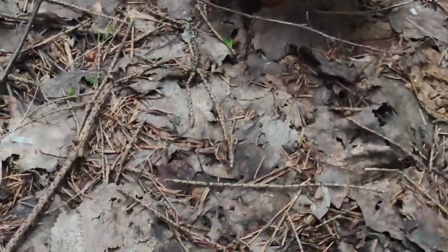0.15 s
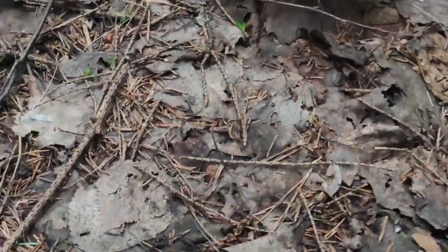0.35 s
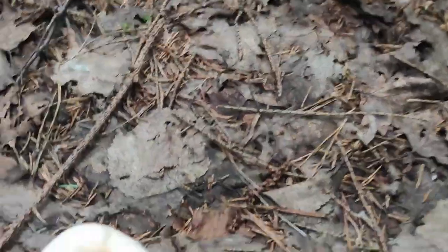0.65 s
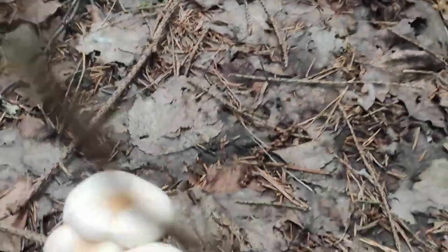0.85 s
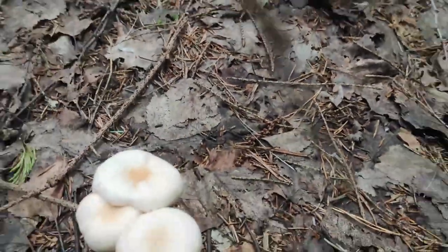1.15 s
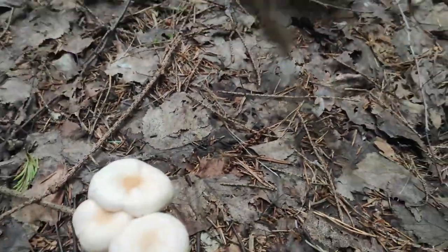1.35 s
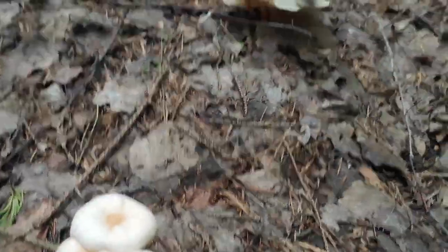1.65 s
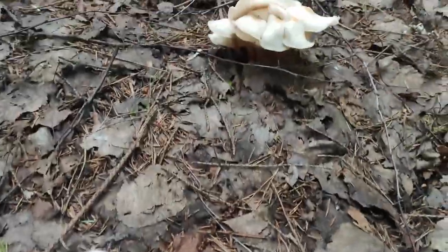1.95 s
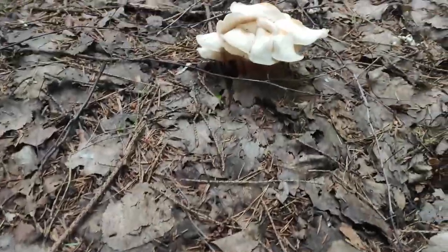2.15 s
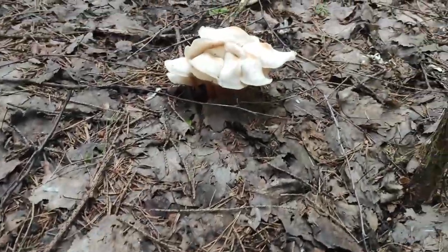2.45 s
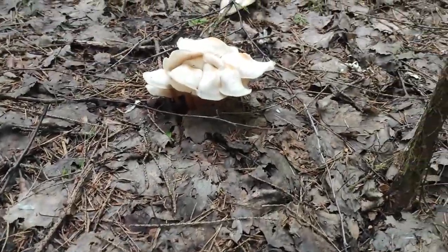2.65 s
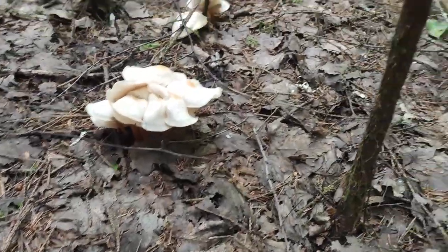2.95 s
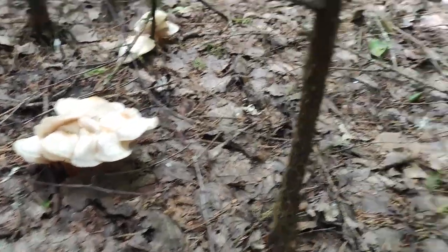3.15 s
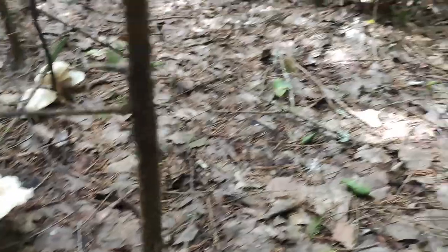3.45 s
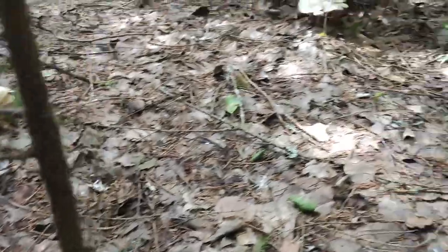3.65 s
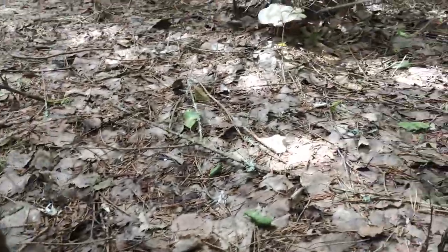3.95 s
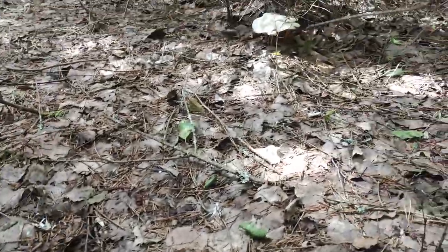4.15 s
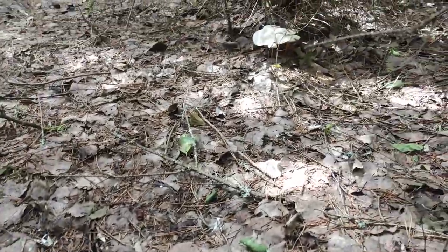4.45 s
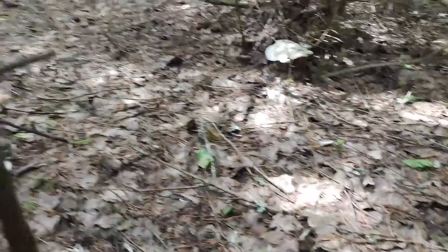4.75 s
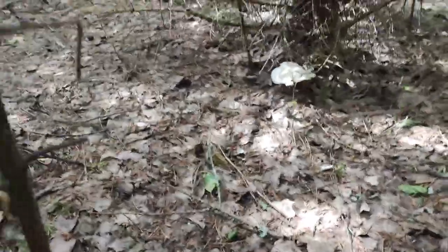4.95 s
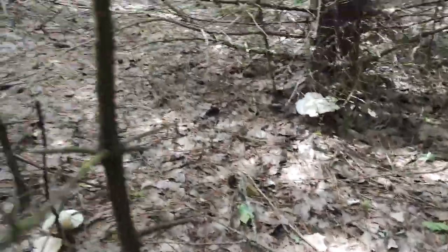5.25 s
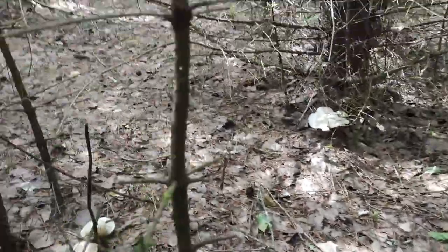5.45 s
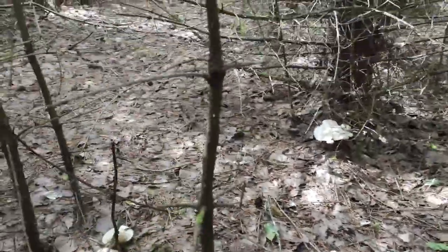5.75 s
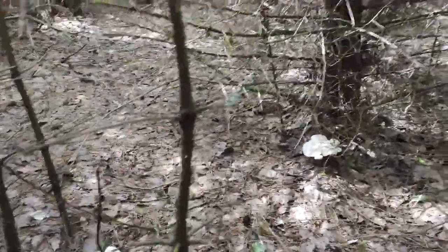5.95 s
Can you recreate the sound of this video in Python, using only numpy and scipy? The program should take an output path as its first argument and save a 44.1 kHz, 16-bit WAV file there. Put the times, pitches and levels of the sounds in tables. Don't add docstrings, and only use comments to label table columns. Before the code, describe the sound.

Close, slow steps on dry leaves and needles: fine crackling throughout, whole leaves crunching, twigs snapping sharply. A very loud snap comes around two and a half seconds, and the densest crunching near five. Far birds chirp quickly at first, then give thin high whistles and three longer calls, softened by echoes from trunks. Low forest hum and gentle treetop hiss, in stereo at chest height.

```python
import sys
import numpy as np
from scipy import signal
from scipy.fft import rfft, irfft, next_fast_len
from scipy.io import wavfile
from scipy.ndimage import uniform_filter1d, map_coordinates

SR = 44100
rng = np.random.default_rng(int(sys.argv[2]) if len(sys.argv) > 2 else 0)


def to_wav(s):
    ch = np.atleast_2d(s).T
    pcm = np.round(np.clip(ch, -1, 1) * 32767)
    wavfile.write(sys.argv[1], SR, pcm.astype(np.int16))


def level_to_linear(level):
    exponent = np.asarray(level, float) / 20
    return 10 ** exponent


N = 269270


def unit(x):
    return x / np.sqrt(np.mean(x ** 2) + 1e-20)


def along(points, hz):
    point_hz, value = np.transpose(points)
    return np.interp(np.log(hz + 1), np.log(point_hz + 1), value)


def curves(rows):
    s, *cols = np.transpose(rows)
    return [np.interp(np.arange(N) / SR, s, c) for c in cols]


def sides(pan_db):
    return np.array([level_to_linear(pan_db / 2), level_to_linear(-pan_db / 2)])


def filtered(x, response):
    m = next_fast_len(N + 8192)
    return irfft(rfft(x, m) * response(np.fft.rfftfreq(m, 1 / SR)), m)[..., :N]


def add(track, s, sound):
    i = max(round(s * SR), 0)
    track[:, i:i + sound.shape[1]] += sound[:, :N - i]


def slow_noise(rate_hz):
    return map_coordinates(rng.standard_normal(int(N * rate_hz / SR) + 4), [np.arange(N) * rate_hz / SR])


def grains(count, span, hz, spread, cycles, scatter_db, lag):
    even, normal = rng.random((count, 3)), rng.standard_normal((count, 3))
    pitch_hz = np.clip(hz * np.exp(spread * normal[:, :1]), 300, SR / 2.5)
    k = np.arange(128)
    turns = pitch_hz * k / SR
    strength = level_to_linear(-scatter_db * np.log(even[:, 1:2] + 0.012)) * np.sqrt(pitch_hz / hz)
    fade = np.exp(-turns / cycles) * np.minimum(2 * turns + 0.32, 1) * (1 - k / len(k))
    wave = strength * np.sin(2 * np.pi * (turns + even[:, 2:])) * fade
    out = []
    for ear in (1, -1):
        start = (even[:, :1] * span + 40 + ear * lag * normal[:, 1:2]).clip(0).astype(int)
        heard = wave * level_to_linear(ear * 2.5 * normal[:, 2:])
        out.append(np.bincount((start + k).ravel(), heard.ravel(), span + 400)[40:span + 40])
    return unit(np.array(out))


def litter():
    # time_s, weight_db, dryness_db
    tread = [(0.0, -61.5, 4), (0.18, -63, 0.5), (0.36, -61, 6), (0.51, -60, 2.5), (1.24, -67, 1.5),
             (1.7, -65, 7.5), (1.93, -67, -1.5), (2.79, -68, 2.5), (3.35, -60, -8), (3.84, -63.5, -3.5),
             (4.08, -68, -1.5), (4.54, -67, -1), (4.74, -61.5, 6.5), (4.91, -55, -12.5), (4.99, -50.5, 4.5),
             (5.16, -54, -7), (5.32, -61.5, 11.5), (5.47, -60, 2.5), (6.1, -63.5, -1.5)]
    weight_db, dry_db = curves(tread)
    press_db = weight_db + 68
    coarse_db = -64.5 + 1.42 * press_db
    crisp_db = -61 + 0.86 * press_db + dry_db
    fine_db = -82 + 1.26 * press_db + 0.64 * dry_db
    shared_db = 1.3 * slow_noise(60)
    coarse_gain = level_to_linear(coarse_db + 0.5 + shared_db + 2.0 * slow_noise(25))
    crisp_gain = level_to_linear(crisp_db + 0.5 + shared_db + slow_noise(30))
    fine_gain = level_to_linear(fine_db + 26.0 + shared_db)
    coarse = grains(count=9000, span=N, hz=1534, spread=0.44, cycles=2.4, scatter_db=2.3, lag=7.95)
    crisp = grains(count=15000, span=N, hz=4300, spread=0.59, cycles=0.4, scatter_db=1.0, lag=8)
    fine = grains(count=13000, span=N, hz=13040, spread=0.3, cycles=2.2, scatter_db=-3.0, lag=8.8)
    return coarse_gain * coarse + crisp_gain * crisp + fine_gain * fine


def crush(db, hz, fizz_db, pan_db, length_s, swell):
    n = round(max(length_s, .008) * SR)
    u = np.linspace(0, 1, n)
    body_hz = hz ** .7 * 3000 ** .3
    body = grains(count=n // 5, span=n, hz=body_hz, spread=0.52, cycles=1.8, scatter_db=3.3, lag=4.5)
    blade = grains(count=n // 40, span=n, hz=hz, spread=0.083, cycles=11.0, scatter_db=4.5, lag=5.4)
    fizz = grains(count=n // 4, span=n, hz=12000, spread=0.31, cycles=0.99, scatter_db=4.5, lag=5)
    jerks = level_to_linear(2 * np.interp(u * length_s / .007, np.arange(40), rng.standard_normal(40)))
    build = .3 + .7 * np.clip(u / swell, 0, 1)
    ends = np.clip(np.minimum(u / .12, (1 - u) / .12), 0, 1)
    mix = body + 0.76 * blade + level_to_linear(fizz_db + 28.5) * fizz
    return level_to_linear(db - 15.5) * jerks * build * ends * mix * sides(pan_db)[:, None]


def crushes():
    # start_s, peak_db, pitch_hz, fizz_db, left_right_db
    small_leaves = [(0.0, -32.5, 1990, -47, 16), (0.554, -28, 5200, -41, 4), (0.829, -32.5, 830, -23, 3),
                    (3.491, -27, 870, -24, 3), (4.748, -34.5, 6400, -21, 29.5),
                    (4.889, -27.5, 3070, -18.5, 0.5), (4.89, -32, 7100, -22, 3), (0.292, -29, 1570, -38, 3),
                    (5.262, -34, 2300, -15, 9), (5.32, -27.5, 3140, -17.5, 0.5),
                    (5.577, -33, 2300, -37, -4), (5.739, -35, 990, -14, -0.5)]
    middle_leaves = [
        (0.69, -30, 1410, -38, 8.5),
        (0.988, -26, 2390, -13, -6),
        (1.689, -35.5, 4200, -29, -3),
        (2.526, -20.5, 2000, -19, -13.5),
        (3.512, -36, 6150, -21, 7),
        (4.69, -30, 2900, -31, 24),
    ]
    large_leaves = [(0.318, -25.5, 1860, -29.5, 1), (0.399, -28, 4830, -31, 1),
                    (1.619, -36, 2180, -16, 0.5), (1.8, -35.5, 5200, -37, 0), (2.17, -39.5, 5230, -39, -4),
                    (2.809, -44, 5470, -38, -14), (4.819, -29.5, 1310, -26, 0.5),
                    (4.95, -25, 3300, -21.5, 4), (4.95, -29.5, 6950, -20, 0), (5.305, -36, 6000, -12, 0),
                    (5.094, -31, 950, -20, 2), (5.159, -51, 880, -12, 7), (5.389, -49.5, 5460, -6, -4)]
    out = np.zeros((2, N))
    # length_s, swell (share of the length over which the crush builds)
    sizes = ((small_leaves, .024, .08), (middle_leaves, .037, .6), (large_leaves, .076, .15))
    for rows, length_s, swell in sizes:
        for s, db, hz, fizz_db, pan_db in rows:
            add(out, s, crush(db, hz, fizz_db, pan_db, length_s, swell))
    return out


def snap(db, hz, fizz_db, pan_db, t60_s):
    t = np.arange(900) / SR
    fade = level_to_linear(-60 * t / max(t60_s * (2500 / hz) ** .5, .002)) * (1 - np.exp(-t * hz / .55))
    modes = ((0.99, 1), (0.856, 0.29), (1.24, 0.53), (1.72, 0.38), (2.24, 0.55))
    ring = fade * sum(g * np.sin(2 * np.pi * hz * r * t) for r, g in modes if hz * r < 8500)
    crack = 0.25 * rng.standard_normal((2, len(t))) * level_to_linear(-60 * t / 0.00033)
    fizz = level_to_linear(fizz_db + 28.0) * np.diff(rng.standard_normal((2, len(t) + 2)), 2) * fade
    pair = np.array([ring, np.roll(ring, 3)]) + crack + fizz
    pair = np.pad(pair, ((0, 0), (62, 62)))
    f = np.fft.rfftfreq(1024, 1 / SR)
    pair = irfft(rfft(pair) / (1 + (.62 * hz / (f + 1)) ** 6), 1024)
    return level_to_linear(db - 2.5) * pair * sides(pan_db)[:, None]


def snaps():
    # start_s, peak_db, pitch_hz, fizz_db, left_right_db
    near_twigs = [
        (.0503, -6, 3000, -38, -19),
        (2.5495, -1, 5700, -29, -8),
        (4.7582, -9, 6300, -30, 19),
        (5.2965, -17, 3000, -26, 4),
    ]
    dead_twigs = [(0.237, -24.5, 1900, -47, 1), (0.305, -18, 940, -34, -1), (0.336, -18, 2080, -35, 0),
                  (0.348, -16, 2360, -34, 7), (0.565, -30, 4000, -17, -20.5), (0.989, -19, 2200, -29, 0),
                  (1.32, -19, 6100, -50, 7), (1.505, -27.5, 1110, -38, -3), (2.535, -18, 2150, -24, 0),
                  (2.5535, -7, 5960, -21, -11), (3.127, -30.5, 915, -32, -1), (3.494, -24, 910, -43, -2),
                  (3.904, -31, 2400, -47, 7), (4.609, -32, 3140, -37, 21), (5.0122, -12, 5250, -22, 4),
                  (5.103, -26, 1030, -27, 0), (5.298, -13.5, 1700, -33, 3), (5.2988, -10, 4300, -20.5, 8),
                  (5.841, -46, 934, -4, -9)]
    stiff_twigs = [
        (0.741, -23, 7140, -13, 0),
        (1.283, -32, 1210, -36, 1),
        (2.457, -33, 7400, -18, 4),
        (4.98, -50, 1320, -22, 4),
        (0.707, -32, 2900, -48, 12),
        (5.557, -31, 630, -31, -2),
        (5.575, -30, 2220, -38, -3),
        (5.739, -31, 1030, -18, 4),
        (5.953, -28.5, 1110, -26.5, -3),
        (6.073, -36, 6000, -14.5, 0),
    ]
    fibre_run = [
        (.9952, -30, 6000, -34, -8),
        (.9996, -26, 6800, -34, -10),
        (1.0036, -26, 6500, -30, -8),
        (1.0083, -25, 5800, -32, -10),
        (1.0103, -22, 5500, -32, -12),
        (1.0142, -24, 7200, -34, -8),
        (1.0217, -30, 6000, -36, 0),
        (1.0254, -25, 6400, -32, 8),
    ]
    scattered_fibres = [(0.354, -32, 1600, -35, 2.5), (2.528, -24, 2180, -32, -8), (2.541, -17, 2130, -36, -11),
                        (3.506, -27, 5860, -32, 3.0), (4.676, -38, 3120, -32, 13), (4.714, -37, 3150, -32, 13.5),
                        (4.763, -27, 5570, -29, 11.5), (4.891, -32, 3020, -32, 1.0), (4.98, -33, 1290, -32, -1),
                        (5.012, -22, 3060, -27, 2.5), (5.021, -37, 1020, -32, 2.0),
                        (5.152, -33, 1570, -35, -1.5), (5.264, -33, 3640, -32, 1.0), (5.282, -19, 4400, -24, 8),
                        (5.654, -40, 2070, -30, -1), (5.697, -32, 2760, -28, -1.0)]
    out = np.zeros((2, N))
    # t60_s, kind_db
    kinds = ((near_twigs, .0042, 0), (dead_twigs, .0072, -3), (stiff_twigs, .013, 0),
             (fibre_run, .004, 3), (scattered_fibres, .004, 3))
    for rows, t60_s, kind_db in kinds:
        for s, db, hz, fizz_db, pan_db in rows:
            add(out, s - 0.001, snap(db + kind_db, hz, fizz_db, pan_db, t60_s))
    return out


def scrapes():
    # start_s, length_s, first_hz, last_hz, level_db
    drags = [
        (4.82, .055, 1050, 1300, -41),
        (3.496, .016, 480, 650, -36),
        (4.97, .07, 1300, 1150, -43),
        (5.322, .011, 3300, 3350, -40),
        (5.361, .011, 3350, 3300, -41),
        (1.503, .014, 820, 780, -46),
        (5.282, .012, 3700, 4300, -45),
        (3.498, .014, 5900, 6100, -43),
        (3.523, .013, 5800, 6000, -46),
        (.64, .06, 900, 1100, -54),
    ]
    out = np.zeros((2, N))
    for s, length_s, first_hz, last_hz, db in drags:
        n = round(max(length_s, .008) * SR)
        tugs = level_to_linear(5 * np.interp(np.arange(n) / SR / .003, np.arange(60), rng.standard_normal(60)))
        pitch_hz = np.linspace(first_hz, last_hz, n) * (1 + 0.117 * np.log(tugs))
        ring = np.sin(2 * np.pi * np.cumsum(pitch_hz) / SR)
        add(out, s, level_to_linear(db) * tugs * ring * np.hanning(n) ** .5 * np.ones((2, 1)))
    return out


def thuds():
    # start_s, peak_db, pitch_hz, left_right_db
    blows = [(1.27, -41.5, 99.6, 5), (1.501, -40.5, 83.4, 5), (2.445, -50, 39, -33), (2.562, -32, 133, -24),
             (3.128, -35.5, 135, 1), (3.298, -39, 178, -4), (3.494, -34.5, 168, 7), (4.393, -38, 40.2, -9),
             (4.893, -35, 248, 6), (5.33, -36.5, 105, -5), (5.796, -31, 205, 0), (5.951, -35.5, 154, 2),
             (6.091, -34, 200, 1)]
    out, t = np.zeros((2, N)), np.arange(SR // 10) / SR
    for s, db, hz, pan_db in blows:
        push = np.sin(2 * np.pi * hz * t) * np.exp(-t * hz / 0.39) * (1 - np.exp(-t / .0015))
        add(out, s, level_to_linear(db + 1) * push * sides(pan_db)[:, None])
    return out


def tone(hz, db, edge_s, waver_hz):
    t = np.arange(len(hz)) / SR
    soft = np.clip(np.minimum(t, t[::-1]) / edge_s, 0, 1)
    level_air, pitch_air = [np.interp(t, np.arange(80) / 120, rng.standard_normal(80)) for _ in range(2)]
    wave = np.sin(2 * np.pi * np.cumsum(hz + waver_hz * pitch_air) / SR)
    return (level_to_linear(db + 1.5 * level_air) * np.sqrt(2) * soft * wave)[None]


def quick_notes(song, whistle):
    # start_s, length_s, first_hz, last_hz, level_db
    late_falls = [
        (0, .045, 4800, 4300, -56),
        (.518, .034, 7100, 6000, -58),
        (.55, .05, 4900, 4400, -60),
        (1.15, .065, 4600, 3600, -61),
        (1.7, .045, 4250, 3500, -62),
        (2.895, .03, 6620, 5900, -53),
    ]
    early_falls = [
        (.2, .075, 4950, 4350, -57),
        (.37, .07, 4950, 4350, -56),
        (.6, .03, 3950, 3700, -65),
        (.853, .025, 5500, 4300, -59),
        (1.073, .02, 5600, 4350, -57),
        (1.372, .016, 5900, 4100, -56),
        (1.684, .018, 5000, 4200, -61),
        (1.63, .023, 4220, 4100, -66),
        (2.965, .15, 3920, 3720, -70),
    ]
    rises = [(.07, .055, 4620, 4720, -63), (.13, .06, 5150, 5400, -61), (.43, .035, 4700, 5800, -59),
             (.765, .035, 6500, 6900, -63), (.812, .03, 6150, 6650, -60), (1.033, .025, 6150, 6550, -58),
             (1.3, .035, 6400, 6600, -67), (1.35, .032, 6000, 6900, -59), (1.398, .038, 4480, 5200, -57),
             (1.498, .038, 4280, 5200, -55), (1.61, .04, 6400, 7300, -62), (1.664, .026, 5950, 6600, -58),
             (1.83, .025, 5300, 6000, -65), (2.795, .035, 5350, 5750, -66), (2.845, .05, 6300, 6620, -52),
             (3.916, 0.062, 1590, 1950, -76)]
    arches = [
        (.878, .09, 4290, 4340, -66),
        (.87, .04, 5380, 5450, -66),
        (1.093, .055, 4350, 4450, -66),
        (1.388, .13, 4100, 4160, -69),
        (1.045, .08, 6480, 6540, -66),
        (2.18, .06, 5600, 6300, -70),
        (3.03, .06, 3280, 3330, -76),
    ]
    notes = []
    for rows, bend in ((late_falls, .3), (early_falls, .75), (rises, .68)):
        notes += [(s, n, a, a + bend * (b - a), b, db) for s, n, a, b, db in rows]
    notes += [(s, n, a, top, a, db) for s, n, a, top, db in arches]
    for s, length_s, first, middle, last, db in notes:
        u = np.linspace(-1, 1, max(round(length_s * SR), 64))
        glide_hz = middle + (last - first) / 2 * u + ((first + last) / 2 - middle) * u * u
        add(whistle if db > -54 else song, s, tone(glide_hz, db, edge_s=0.003, waver_hz=35))


def held_notes(whistle):
    # start_s, length_s, first_hz, held_hz, level_db
    held_rows = [
        (.055, .115, 7250, 7480, -58),
        (.185, .115, 7200, 7480, -59),
        (1.79, .09, 7400, 7450, -68),
        (2.47, .06, 7480, 7440, -56),
        (2.605, .155, 7050, 7460, -52),
    ]
    # share_of_length, level_db
    held_shape = [(0, -5), (.3, 0), (.6, -3), (1, -13)]
    for s, length_s, first_hz, held_hz, db in held_rows:
        t = np.arange(0, length_s, 1 / SR)
        level_db = db + np.interp(t / length_s, *np.transpose(held_shape))
        pitch_hz = held_hz + (first_hz - held_hz) * np.exp(-t / .022)
        add(whistle, s, tone(pitch_hz, level_db, edge_s=0.003, waver_hz=26))


def bowed_notes(whistle):
    # start_s, length_s, rest_hz, top_hz, level_db
    bow_rows = [
        (3.235, .31, 3830, 4200, -63.5),
        (3.755, .31, 3740, 4000, -64),
        (4.26, .3, 3720, 4010, -64.5),
    ]
    # share_of_length, lift_to_top, level_db
    bow_shape = [(0, 0, -3), (.1, .6, -1), (.3, 1, -3), (.45, .7, -3), (.6, .15, 0), (.88, 0, -1),
                 (1, -.1, -8)]
    share, lift, swell_db = np.transpose(bow_shape)
    for s, length_s, rest_hz, top_hz, db in bow_rows:
        u = np.arange(0, length_s, 1 / SR) / length_s
        pitch_hz = rest_hz + (top_hz - rest_hz) * np.interp(u, share, lift)
        level_db = db + np.interp(u, share, swell_db)
        add(whistle, s, tone(pitch_hz, level_db, edge_s=0.0031, waver_hz=30))
        add(whistle, s, tone(1.125 * pitch_hz, level_db - 6, edge_s=0.024, waver_hz=60))


def birds():
    song, whistle = np.zeros((1, N)), np.zeros((1, N))
    quick_notes(song, whistle)
    held_notes(whistle)
    bowed_notes(whistle)
    direct = level_to_linear(6.5) * (1.4 * song * sides(np.array([1.5])) + whistle * sides(np.array([3])))
    direct[1] = np.roll(direct[1], 4)
    foliage = .6 + .8 * slow_noise(220)
    return direct + echoes(level_to_linear(8) * (song + 0.5 * whistle) * foliage)


def echoes(x):
    # pitch_hz, t60_s
    trunks = [(1000, .45), (4000, .4), (8000, .33)]
    hz, t, z = signal.stft(rng.standard_normal((2, SR // 2)), SR, nperseg=256)
    tail = signal.istft(z * level_to_linear(-60 * t / along(trunks, hz)[:, None]), SR, nperseg=256)[1]
    return signal.fftconvolve(x, tail / np.linalg.norm(tail[0]), axes=1)[:, :N]


def rush(spectrum, patchy_db):
    # pitch_hz, left_right_likeness
    alike = [(30, 0.038), (100, 0.42), (400, 0.72), (1000, 0.09), (3000, 0.31), (12000, 0.11)]
    z = signal.stft(rng.standard_normal((2, N)), nperseg=512)[2]
    field = uniform_filter1d(rng.standard_normal(z.shape[1:]), size=6, axis=0)
    field = uniform_filter1d(field, size=12, axis=1)
    pair = signal.istft(z * level_to_linear(patchy_db * unit(field)), nperseg=512)[1][:, :N]

    def response(hz):
        turn = np.arccos(np.clip(along(alike, hz), -1, 1)) / 2
        return level_to_linear(along(spectrum, hz)) * [np.cos(turn), np.sin(turn)]

    mid, side = filtered(pair, response)
    return unit(np.array([mid + side, mid - side]))


def forest():
    # time_s, level_db
    breeze = [(0.0, -57), (0.39, -53), (1.22, -55.5), (1.66, -57.5), (1.97, -58.5), (2.68, -57.5),
              (3.45, -55), (4.28, -58.5), (4.99, -56.5), (5.23, -51.5), (5.71, -52.5), (6.1, -57.5)]
    # pitch_hz, density_db (per Hz)
    rumble_spectrum = [(12, -21), (20, -0.5), (72, 0), (104, -7), (498, -16), (545, -23), (921, -29),
                       (1500, -27), (1950, -68), (3300, -120)]
    hiss_spectrum = [(290, -9.5), (500, -5.5), (577, -5.5), (630, -6), (998, -10), (1290, -31), (1930, -14),
                     (2940, -14), (3390, -14), (3750, -13.5), (4090, -13.5), (6120, -14.5), (11500, -46),
                     (15600, -28)]
    hiss_db, = curves(breeze)
    rumble_db = -58 + 0.37 * (hiss_db - hiss_db.mean())
    rumble = level_to_linear(rumble_db) * rush(rumble_spectrum, patchy_db=1.0)
    return rumble + level_to_linear(hiss_db - 1.5) * rush(hiss_spectrum, patchy_db=2.5)


def scene():
    # pitch_hz, gain_db
    mic = [(20, -5), (7000, -4), (7700, -8.5), (8400, -24.5), (11000, -21.5), (14000, -20), (14600, -49),
           (16000, -39)]
    near = crushes() + snaps() + scrapes()
    steps = litter() + near + level_to_linear(-28.5) * echoes(near.mean(0)[None])
    return filtered(steps, lambda hz: level_to_linear(along(mic, hz))) + thuds() + birds() + forest()


def roll_off(x):
    return signal.sosfilt(signal.butter(12, 15780, fs=SR, output="sos"), x)


def record(dry):
    return roll_off(dry)


dry = scene()
out = record(dry)
to_wav(out)
```